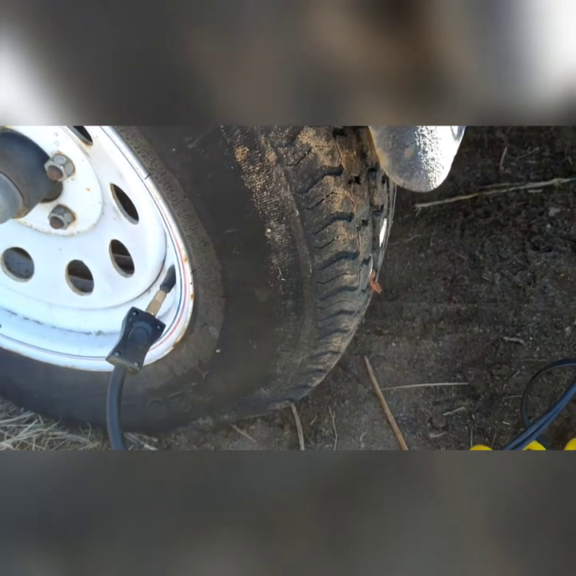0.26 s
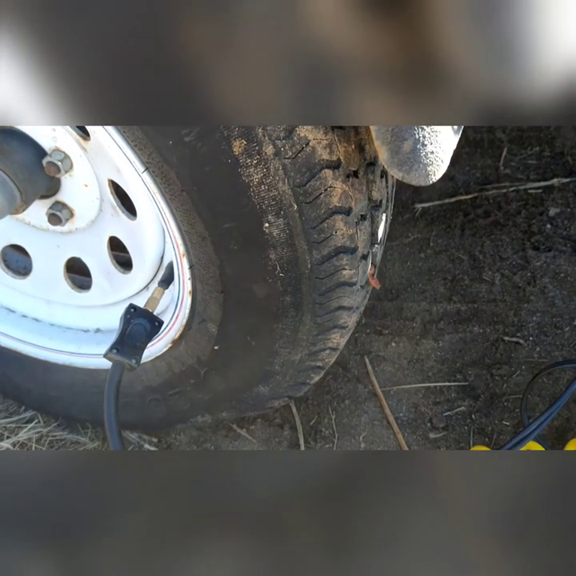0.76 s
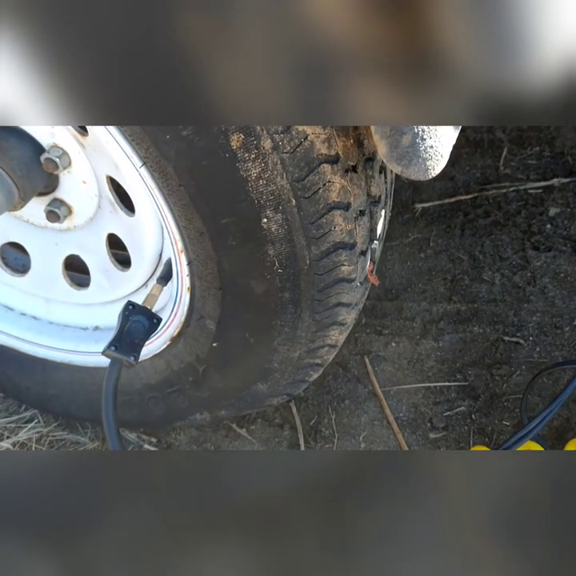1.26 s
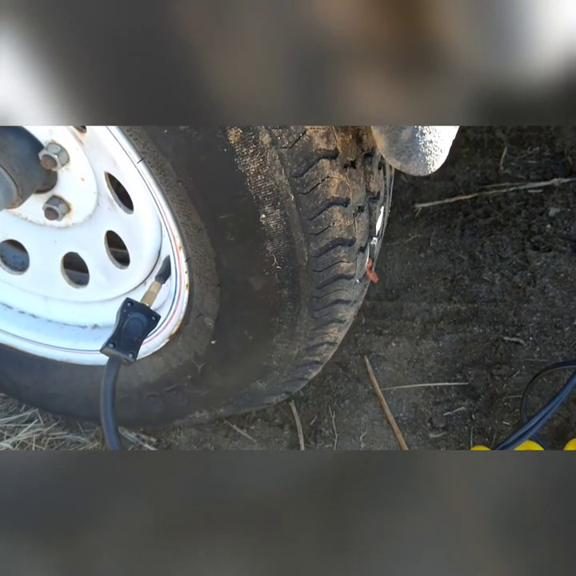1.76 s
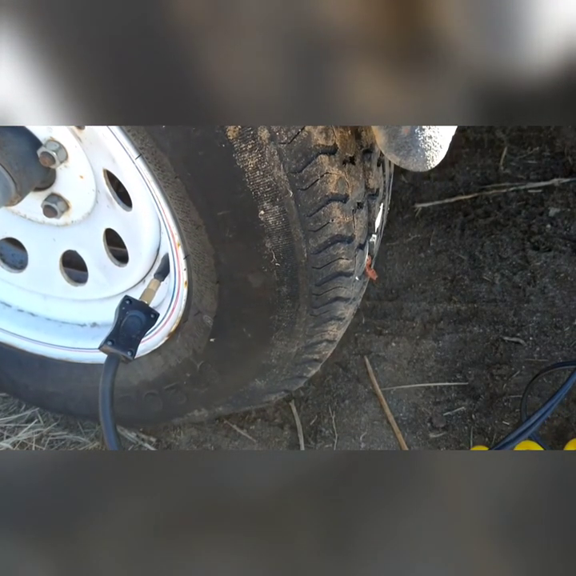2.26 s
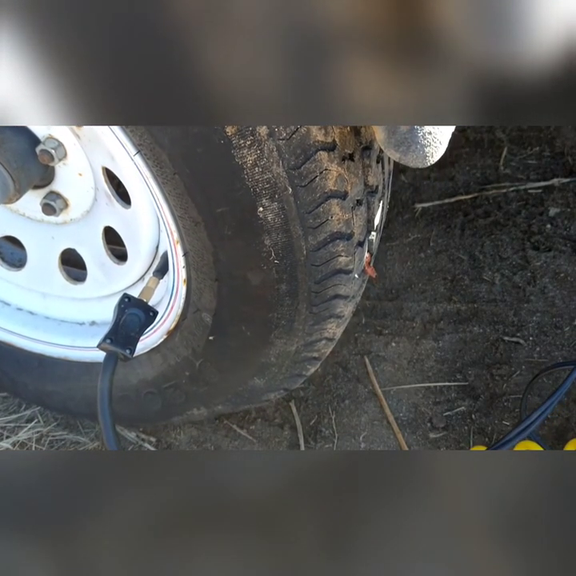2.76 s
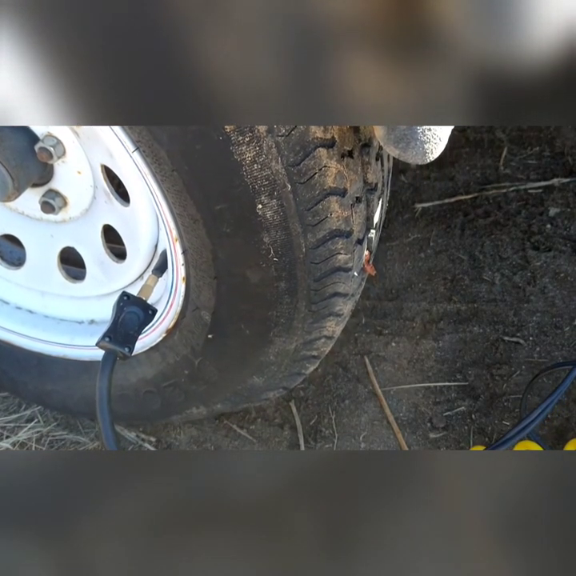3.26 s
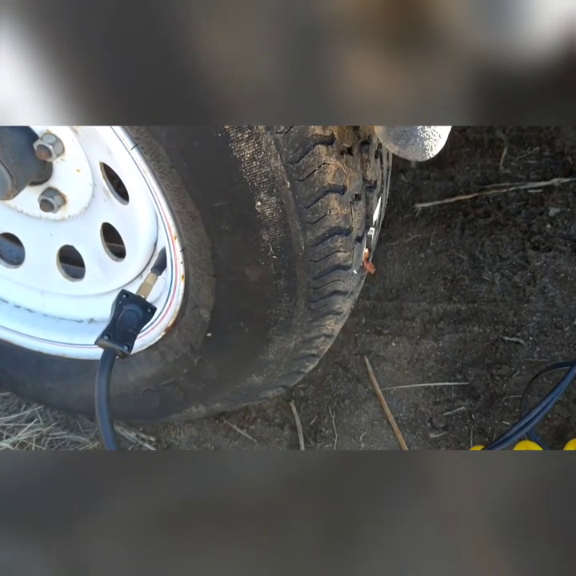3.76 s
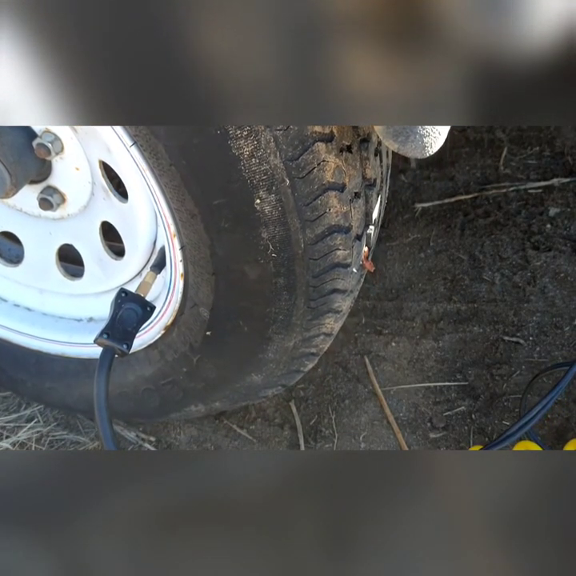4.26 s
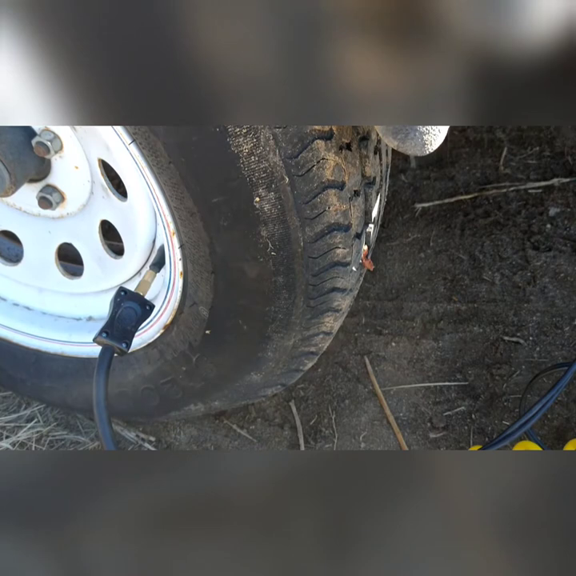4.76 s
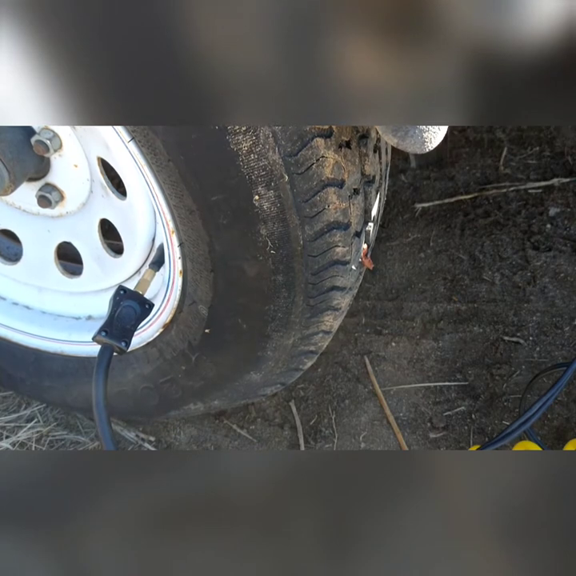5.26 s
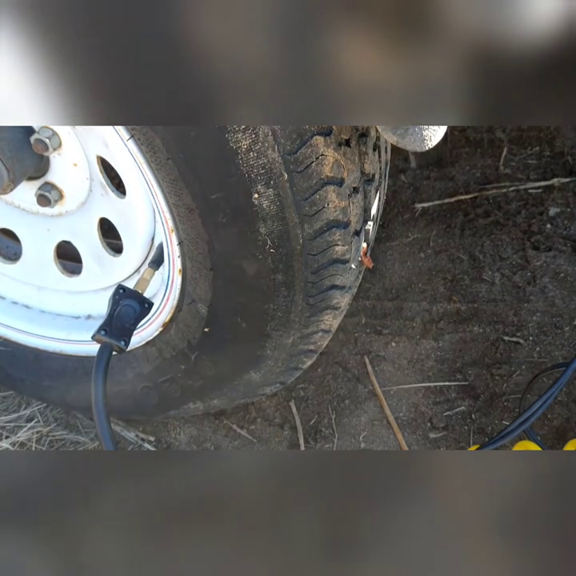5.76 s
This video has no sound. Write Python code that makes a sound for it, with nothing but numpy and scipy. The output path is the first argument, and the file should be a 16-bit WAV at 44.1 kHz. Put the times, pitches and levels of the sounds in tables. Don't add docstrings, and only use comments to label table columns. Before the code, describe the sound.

A small air compressor drones with a rapid, buzzing rattle while pumping a tire outdoors, louder and hissier for the first half second.

```python
import sys
import numpy as np
from scipy import signal
from scipy.fft import rfft, irfft
from scipy.io import wavfile
from scipy.ndimage import uniform_filter1d

SR = 44100
rng = np.random.default_rng(int(sys.argv[2]) if len(sys.argv) > 2 else 0)


def convert_level_to_amplitude(level_db):
    exponent = np.asarray(level_db, float) / 20
    return 10 ** exponent


def master_out(mix):
    frames = np.transpose(np.atleast_2d(mix))
    ceiling = np.clip(frames, -1, 1)
    pcm = np.round(ceiling * 32767).astype(np.int16)
    wavfile.write(sys.argv[1], SR, pcm)


N = 264600
TIME = np.arange(N) / SR
PORT_LAG = 17

# crank order, left and right dB at low pressure, left and right dB at high pressure.
ORDERS_DB = [(1, -55, -54, -54, -53), (2, -46, -46, -45, -45), (3, -67, -65, -62, -61),
             (4, -53, -50, -53, -50), (5, -46, -45, -45, -44), (6, -43, -42, -42, -41),
             (7, -39, -40, -40, -42), (8, -41, -45, -43, -46), (9, -44, -41, -43, -41),
             (10, -45, -46, -42, -42), (11, -59, -54, -54, -50), (12, -54, -54, -53, -53),
             (13, -47, -53, -47, -66), (14, -50, -53, -49, -56), (15, -57, -57, -58, -52),
             (16, -58, -62, -57, -57), (17, -69, -56, -65, -52), (18, -64, -62, -59, -55),
             (19, -65, -60, -59, -55), (20, -51, -46, -53, -49), (21, -48, -42, -57, -49),
             (22, -47, -44, -49, -47), (23, -59, -63, -60, -68), (24, -58, -56, -58, -54)]
OUTLINE_DB = [(25, -65, -56, -58, -51), (26, -62, -58, -64, -63), (27, -56, -54, -56, -54),
              (28, -63, -57, -62, -58), (31, -73, -72, -74, -74), (32, -62, -60, -60, -62),
              (33, -66, -66, -65, -66), (36, -63, -63, -67, -64)]
KNOCK_ARRIVAL = [(11.5, .46), (14, -.22), (16.5, .29), (18, -.11), (22.5, .3), (23.5, -.1), (31, .2),
                 (34, -.2)]
# order, width in orders, extra dB while leaking, extra dB with loose reed.
EARLY_DB = [(3, .4, 7, .5), (11, .4, -4, -1), (13, .4, 3, 1), (16.8, .6, -3, 8), (18.7, .7, -15, -6),
            (21, .4, 2, 1), (28.6, .8, 6, 2.5), (33.2, 1.6, 2, 11.5), (36, .5, -8, -10)]
TYRE_ECHO = [(8, .4, -.6), (12.8, .6, .5), (15.7, .65, -2.4), (21.2, 1.2, .42), (23, .4, 1.6),
             (35, .4, -.6)]
WAVER_GROUPS = [(1, 11), (12, 18), (19, 23), (24, 30), (31, 36)]
# timing wobble in turns, level flutter in dB, share of start-up rattle 0-1.
WAVER = [(.0006, 0.66, .01), (.0006, -0.3, 0.089), (.0006, -1.25, 1), (.0006, 2, 1), (.0006, 2.9, 0.38)]
# crank angle in turns, ring in Hz, width in Hz, level in dB,
# left minus right in dB, growth with pressure in dB.
VALVE_SLAPS = [(0.94, 2101, 111, -33, 1, -2), (0.77, 2474, 115, -37, -3, 8.5),
               (0.89, 4070, 131, -36, -5, -1), (0.88, 4830, 90, -48.5, 1, 7), (0.76, 5666, 147, -51, -2, 4),
               (0.68, 6730, 157, -50, -4, 3), (0.82, 7315, 163, -50, -2, -2), (0.26, 8273, 173, -51, -2, -1),
               (0.71, 9283, 183, -50, -8, 0), (0.29, 10826, 198, -57, -4, -2),
               (0.21, 11997, 210, -56, -6, 0), (0.69, 13380, 224, -59, -5, 5),
               (.99, 2715, 85, -32, -2.5, -2), (.63, 2815, 55, -35, -4, .1), (.94, 2165, 30, -39, 2, -8),
               (.64, 2930, 70, -36, -2.5, 1.5), (.75, 3200, 70, -38, -2.5, 1.5),
               (.12, 3480, 60, -42, -1.5, .1), (.55, 4330, 90, -44, -1.5, .1),
               (.3, 7580, 90, -55, -1.5, .1), (.8, 2452, 32, -36, -1.5, 6), (.2, 6350, 110, -51, -3, 1.5)]
LOOSE_SLAPS = [(.75, 2570, 45, -28, -1.5, .1), (.05, 2785, 30, -30, -1.5, .1),
               (.75, 3120, 60, -27, -1.5, .1)]
# frequency in Hz, density in dB per Hz.
CASING_AIR = [(20, -18), (70, -3.5), (400, -4.5), (880, -3), (1150, 0.5), (1600, -9), (1800, -4),
              (2050, -12.5), (3300, -12.5), (3650, -25), (5000, -20), (6100, -32), (9500, -30.5),
              (11400, -45), (15000, -38)]
# frequency in Hz, density in dB per Hz.
COUPLING_LEAK = [(1500, -24), (2500, -34), (3300, -4.5), (3700, 7), (4100, 1), (5000, -15), (6000, -3),
                 (7000, -11), (9500, -10.5), (11400, -17.5), (12200, -12.5), (14800, -18.5), (15300, -29)]
# frequency in Hz, shared part 0-1.
ALIKE = [(100, .95), (1000, .8), (2500, .55), (4000, .55), (8000, .4), (14000, .5)]
# moment in seconds, width in seconds, extra level in dB.
SPURTS = [
    (.02, 0.013, 6.5),
    (.085, .015, 2.5),
    (.22, 0.018, 3.5),
    (.33, 0.014, 2),
    (.445, .025, 1.5),
    (5.667, .01, 5),
]
# centre in seconds, length in seconds, pitch in Hz,
# glide in Hz per second, level in dB.
WHISTLES = [
    (0.29, 0.66, 6950, 4, -49),
    (3.004, .6, 8330, 151, -51),
    (3.404, 0.88, 9160, 29, -53),
    (5.6, .6, 8700, 60, -47),
    (5.6, 0.65, 13500, 248, -56),
    (2.988, .7, 7400, 56.5, -64),
]
# moment in seconds, level in dB, drag in seconds.
SCUFFS = [
    (.055, -41, .09),
    (5.54, -53, .05),
    (5.665, -47, .065),
    (5.9, -62, .02),
]
# moment in seconds, turns skipped, crossfade in milliseconds.
SKIPS = [
    (1.175, .17, 11),
    (2.591, .17, 15),
]
# frequency in Hz, width in Hz, depth 0-1.
HOUSING = [(3545, 82, 0.9), (5850, 250, 0.35), (3700, 100, 0.64), (6020, 150, 0.8), (8850, 69, 0.1),
           (11100, 240, 0), (2090, 42, 0.8), (15250, 500, 0.5)]

START_TURNS, IDLE_HZ, CLIMB_HZ, CLIMB_START_S, CLIMB_S = -.37, 52.46, .94, .75, 2.4
SEAL_S, SEAL_RAMP_S, SEEP = .52, .082, .19
BUILD_START_S, BUILD_END_S, CREEP_PER_S = 1.34, 3.8, .093
LOOSE_OPEN, LOOSE_SEALED, LOOSE_SEATED, LOOSE_REST, SEAT_S, SETTLE_S = .48, .74, .17, .058, .994, .22
RATTLE_DB, RATTLE_FADE_S, UNLOADED_DB = 6, .22, .33
QUIET_DB, LOUD_DB, LOUD_RISE_DB_PER_S = -35.5, 6, 2.5
AIR_DB, LEAK_DB, RIGHT_TREBLE_DB = -19, .5, 5.5
LEAK_OPEN_DB, LEAK_SEALED_DB, LEAK_RISE_DB_PER_S = -53.5, -67.5, .27
SLAP_DB, LEAK_SLAP_DB, SLAP_SCATTER_DB, SLAP_JITTER_US, SLAP_AIR = 3.5, 9, 1.0, 5., .006
PULSE_LEAN_TURNS, GLIDE_START_TURNS, GLIDE_TURNS_PER_ORDER = -.155, -.357, .065
HOSE_ORDER, HOSE_HOLD_TURNS = 4.6, .09
TURN_POINTS = 16384
ENGINE_START_S, ENGINE_HZ, WIND_DOWN_S = 4.1, 40, 1.6
ENGINE_DB, ENGINE_NEAREST_S, ENGINE_SWELL_S, ENGINE_TAIL_DB = -51.5, 4.9, .27, -59


def unit(x):
    return x / np.sqrt(np.mean(x ** 2))


def bump(x, centre, width):
    return np.exp(-.5 * ((x - centre) / width) ** 2)


def ramp(centre_s, length_s):
    return np.clip(.5 + (TIME - centre_s) / length_s, 0, 1)


def ring(x, hz, width_hz):
    return signal.lfilter(*signal.iirpeak(hz, hz / width_hz, SR), x)


def walk(rate):
    hold = int(SR / rate)
    steps = np.repeat(rng.standard_normal(N // hold + 1), hold)
    return 0.28 * uniform_filter1d(uniform_filter1d(steps, hold), hold)[:N]


def ports(shape, gate):
    hz = np.arange(N // 2 + 1) * SR / N + 1

    def read(table):
        knots, values = np.transpose(table)
        return np.interp(np.log(hz), np.log(knots), values)

    both, left, right = rfft(rng.standard_normal((3, N)) * gate)
    share = np.clip(read(ALIKE), 0, 1)
    late = np.exp(-2j * np.pi * np.arange(N // 2 + 1) * PORT_LAG / N)
    tilt = convert_level_to_amplitude(RIGHT_TREBLE_DB * hz / SR * 2)
    common = both * np.array([late / tilt, tilt])
    own = np.array([left / tilt, right * tilt])
    pair = np.sqrt(share) * common + np.sqrt(1 - share) * own
    return unit(irfft(pair * convert_level_to_amplitude(read(shape)), N))


def load():
    sealed, seated = ramp(SEAL_S, SEAL_RAMP_S), ramp(SEAT_S, SEAL_RAMP_S)
    built = ramp((BUILD_START_S + BUILD_END_S) / 2, BUILD_END_S - BUILD_START_S)
    pressure = built + CREEP_PER_S * np.maximum(TIME - BUILD_END_S, 0)
    settling = np.exp(-np.maximum(TIME - SEAT_S, 0) / SETTLE_S)
    after = LOOSE_REST + (LOOSE_SEATED - LOOSE_REST) * settling
    before = LOOSE_OPEN + (LOOSE_SEALED - LOOSE_OPEN) * sealed
    loose = (1 - seated) * before + seated * after
    leaking = 1 - sealed + sealed * SEEP * (1 - built)
    rattle_db = RATTLE_DB * np.exp(-TIME / RATTLE_FADE_S) + UNLOADED_DB * sealed * (1 - built)
    return pressure, leaking, loose, rattle_db


def engine():
    since = np.maximum(TIME - ENGINE_START_S, 0)
    hz = ENGINE_HZ * np.exp(-since / WIND_DOWN_S)
    swell = bump(TIME, ENGINE_NEAREST_S, ENGINE_SWELL_S)
    gain = np.maximum(convert_level_to_amplitude(ENGINE_DB) * swell, convert_level_to_amplitude(ENGINE_TAIL_DB) * (TIME > ENGINE_NEAREST_S))
    firings = np.diff(np.floor(np.cumsum(hz) / SR), prepend=0)
    boom = ring(ring(firings, 88, 45), 102, 70)
    boom = boom + convert_level_to_amplitude(-17.0) * ring(ring(firings, 180, 71), 180, 95)
    return unit(boom / np.sqrt(hz)) * gain * np.ones((2, 1))


def scuff():
    grit = convert_level_to_amplitude(2.5 * rng.exponential(size=N)) * (rng.random(N) < .03)
    drag = np.zeros(N)
    for s, db, length_s in SCUFFS:
        width_s = np.where(TIME < s, .5, 1) * length_s
        drag += convert_level_to_amplitude(db) * bump(TIME, s, width_s)
    hollow = [(250, -25), (500, -6), (620, -11), (780, -.1), (950, -13), (1150, -2), (1400, -15),
              (3000, -32), (13000, -52)]
    return drag * ports(hollow, grit)


def puffs(turns, angles, fade_turns, steady):
    return steady + sum(np.exp(-((turns - a) % 1) / fade_turns) for a in angles)


def whistles(turns):
    out = np.zeros((2, N))
    throb = puffs(turns, (.3,), 0.34, 0.78)
    lowpass = signal.butter(2, 61, fs=SR)
    for s, length_s, hz, glide, db in WHISTLES:
        rough = unit(signal.lfilter(*lowpass, rng.standard_normal((2, N))))
        angle = 2 * np.pi * (hz + glide * (TIME - s) / 2) * (TIME - s)
        out += convert_level_to_amplitude(db) * bump(TIME, s, length_s) * throb * (rough + rough[1]) * np.cos(angle)
    return out


def coupling_leak(turns, still_open):
    leaking = load()[1]
    db = LEAK_SEALED_DB + LEAK_RISE_DB_PER_S * TIME + still_open * (LEAK_OPEN_DB - LEAK_SEALED_DB)
    db = db + sum(extra_db * bump(TIME, s, width_s) for s, width_s, extra_db in SPURTS)
    flutter_db = (2.7 + 1.2 * leaking) * walk(45)
    return convert_level_to_amplitude(db + LEAK_DB + flutter_db) * ports(COUPLING_LEAK, puffs(turns, (.14, .68, .86), 0.14, 0.36))


def casing_air(turns):
    db = AIR_DB + 1.6 * load()[3] + walk(6)
    return convert_level_to_amplitude(db) * ports(CASING_AIR, puffs(turns, (.03, .5, .74), 0.13, 1.0))


def valves(turns, slaps):
    pressure, leaking = load()[:2]
    out = np.zeros((2, N))
    for angle, hz, width_hz, db, left_db, growth_db in slaps:
        count = np.arange(np.ceil(turns[0] - angle), turns[-1] - angle)
        jitter, scatter = rng.standard_normal((2, len(count)))
        at = np.interp(count + angle, turns, TIME) + SLAP_JITTER_US * jitter / 1e6
        at = np.clip(at * SR, 0, N - 2)
        strength = convert_level_to_amplitude(SLAP_SCATTER_DB * scatter)
        hits = SLAP_AIR * rng.standard_normal(N)
        hits[at.astype(int)] += strength * (1 - at % 1)
        hits[at.astype(int) + 1] += strength * (at % 1)
        tone = unit(ring(ring(hits, hz, width_hz), hz, 8.8 * width_hz))
        swell_db = growth_db * pressure + LEAK_SLAP_DB * leaking * (hz > COUPLING_LEAK[2][0])
        tone *= convert_level_to_amplitude(SLAP_DB + db) * np.repeat(convert_level_to_amplitude(swell_db[::100]), 100)
        out += np.array([convert_level_to_amplitude(left_db) * np.roll(tone, PORT_LAG), tone])
    return out


def one_turn(first, last):
    order = np.arange(1, OUTLINE_DB[-1][0] + 2)
    knots, *columns = np.transpose(ORDERS_DB + OUTLINE_DB)
    low_left, low_right, high_left, high_right = [np.interp(order, knots, c) for c in columns]
    low, high = [low_left, low_right], [high_left, high_right]
    db = np.array([low, high, low, low])
    for centre, width, *extra_db in EARLY_DB:
        db[2:] += np.reshape(extra_db, (2, 1, 1)) * bump(order, centre, width)

    lead = np.array([-2 * np.pi * order * 53 * PORT_LAG / SR, 0. * order])
    lead[0] += sum(radians * bump(order, centre, width) for centre, width, radians in TYRE_ECHO)

    between = order - .5
    glide = GLIDE_START_TURNS + GLIDE_TURNS_PER_ORDER * between
    knocks = np.interp(between, *np.transpose(KNOCK_ARRIVAL))
    late = np.where(between < KNOCK_ARRIVAL[0][0], glide, knocks)
    hose = (order > HOSE_ORDER) * (1 + bump(order, HOSE_ORDER, 0.31))
    lag = PULSE_LEAN_TURNS + np.cumsum(late) + HOSE_HOLD_TURNS * hose

    lines = np.zeros((4, 2, TURN_POINTS // 2 + 1), complex)
    inside = (order >= first) * (order <= last)
    lines[..., 1:len(order) + 1] = convert_level_to_amplitude(db) * np.exp(1j * (lead - 2 * np.pi * lag)) * inside
    return irfft(lines, TURN_POINTS) * TURN_POINTS / np.sqrt(2)


def strokes(turns, fades):
    pressure, leaking, loose, rattle_db = load()
    firm = 1 - loose
    state = np.array([(1 - pressure) * firm, pressure * firm, leaking * loose, (1 - leaking) * loose])
    skipped = np.cumsum([0] + [row[1] for row in SKIPS])
    out = np.zeros((2, N))
    for (first, last), (wobble, flutter_db, rattles) in zip(WAVER_GROUPS, WAVER):
        shapes = one_turn(first, last).astype(np.float32)
        angle = turns + wobble * walk(45)
        gain = convert_level_to_amplitude(flutter_db * walk(50) + rattles * rattle_db)
        for step, fade in zip(skipped, fades):
            on = fade > 0
            point = ((angle[on] + step) * TURN_POINTS).astype(int) % TURN_POINTS
            out[:, on] += (fade * gain)[on] * np.einsum("sn,spn->pn", state[:, on], shapes[..., point])
    return out


def scene():
    crank_hz = IDLE_HZ + CLIMB_HZ * np.tanh(np.maximum(TIME - CLIMB_START_S, 0) / CLIMB_S)
    turns = START_TURNS + np.cumsum(crank_hz) / SR
    first_skip, second_skip = [ramp(s, ms / 1000) for s, _, ms in SKIPS]
    heard = turns + first_skip * SKIPS[0][1] + second_skip * SKIPS[1][1]
    fades = [1 - first_skip, first_skip - second_skip, second_skip]

    still_open = 1 - ramp(SEAL_S, SEAL_RAMP_S)
    loud_db = still_open * (LOUD_DB + LOUD_RISE_DB_PER_S * TIME)
    slaps = valves(heard, VALVE_SLAPS) + load()[2] * valves(heard, LOOSE_SLAPS)
    machine = convert_level_to_amplitude(QUIET_DB + loud_db) * (whistles(heard) + casing_air(heard) + slaps)
    body = convert_level_to_amplitude(loud_db) * strokes(turns, fades)
    return engine() + scuff() + coupling_leak(heard, still_open) + machine + body


def top_cut(x):
    return signal.sosfilt(signal.butter(12, 15660, fs=SR, output="sos"), x)


def record(dry):
    for hz, width_hz, depth in HOUSING:
        dry = dry - depth * ring(dry, hz, width_hz)
    return top_cut(dry)


dry = scene()
out = record(dry)
master_out(out)
```